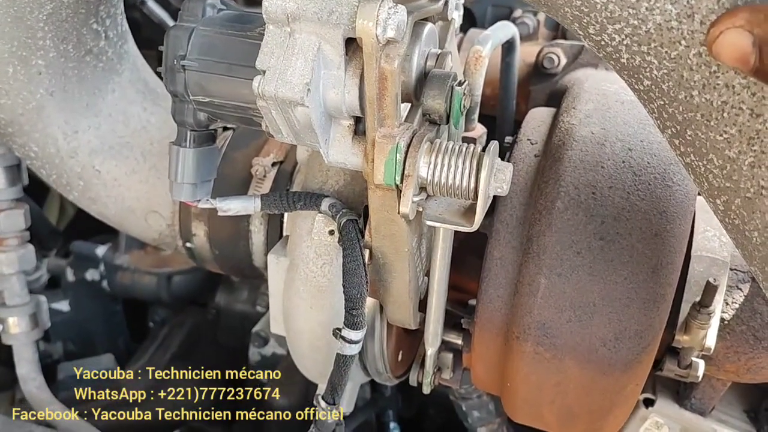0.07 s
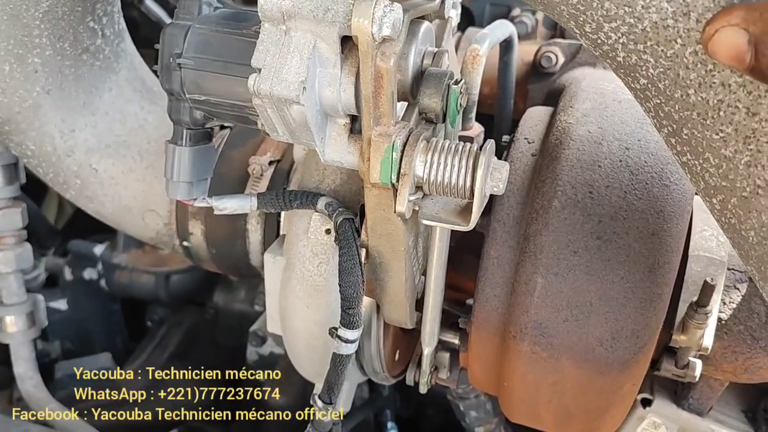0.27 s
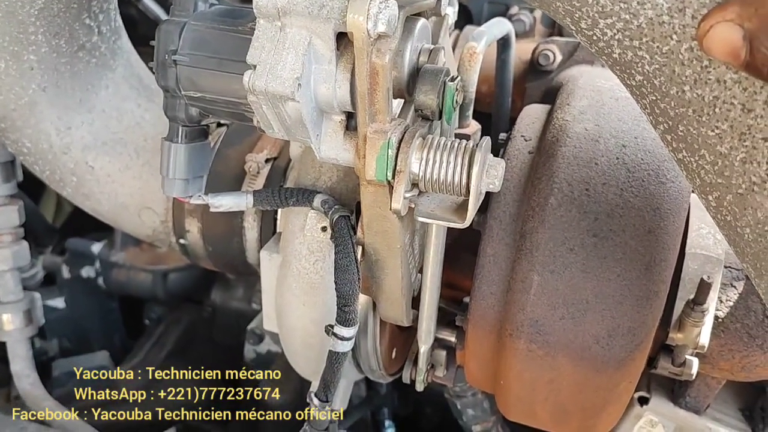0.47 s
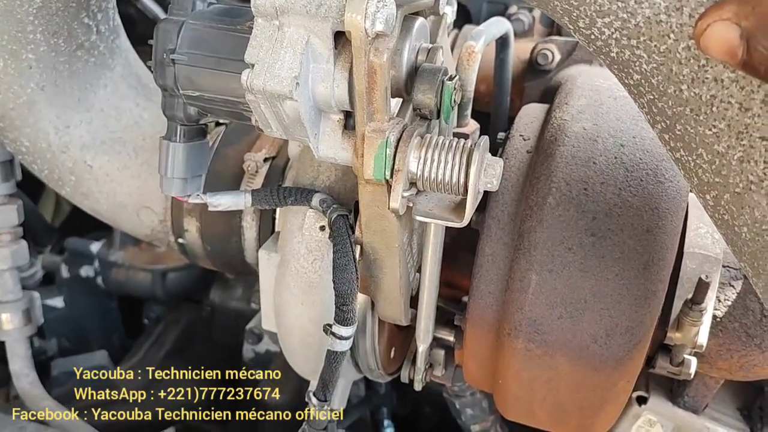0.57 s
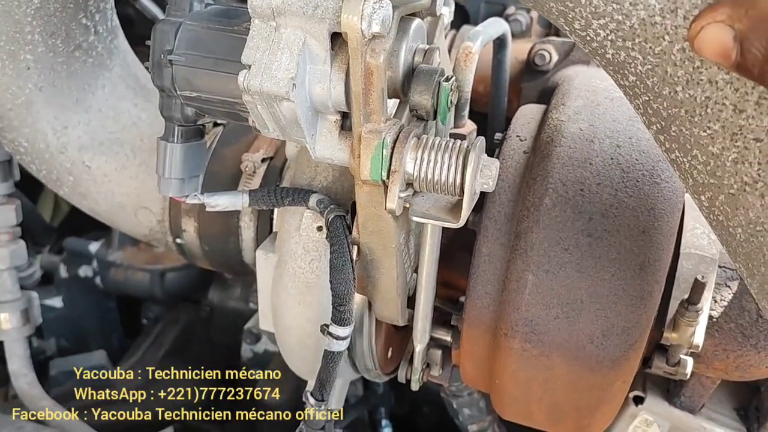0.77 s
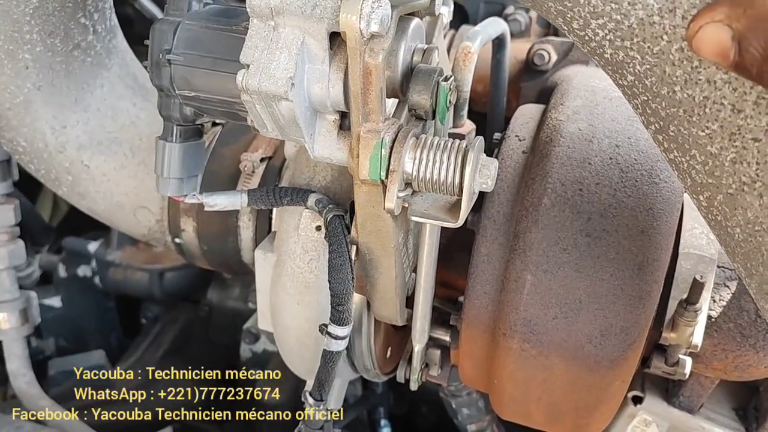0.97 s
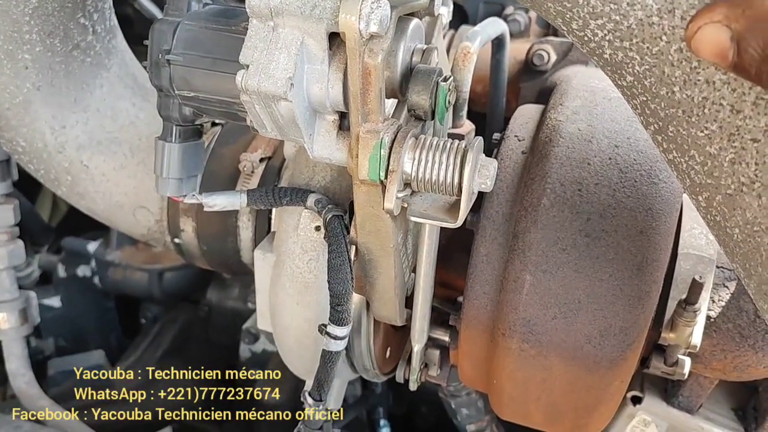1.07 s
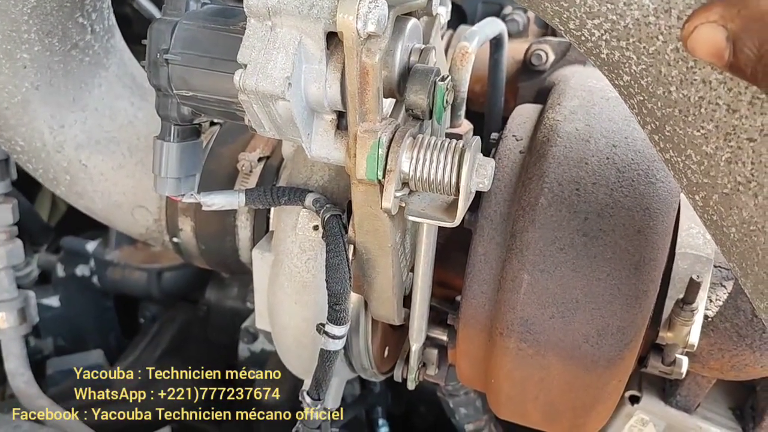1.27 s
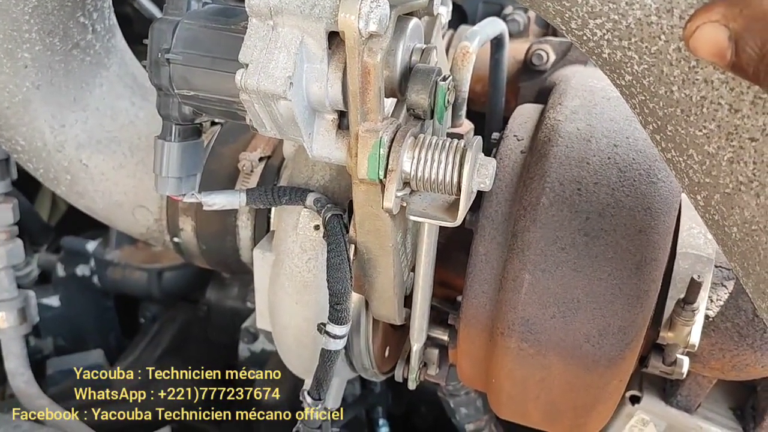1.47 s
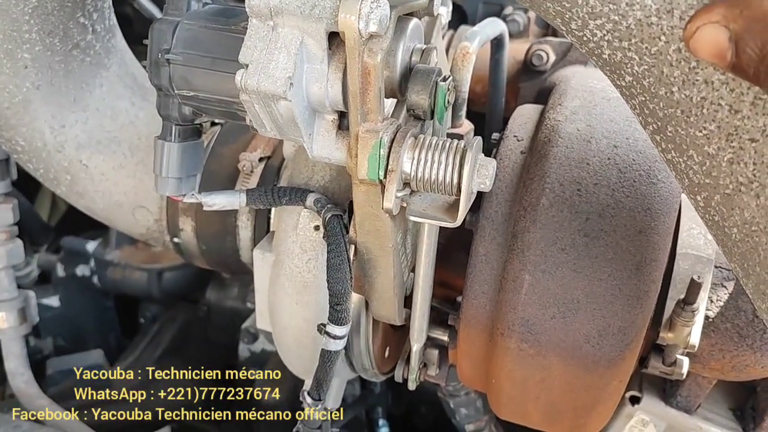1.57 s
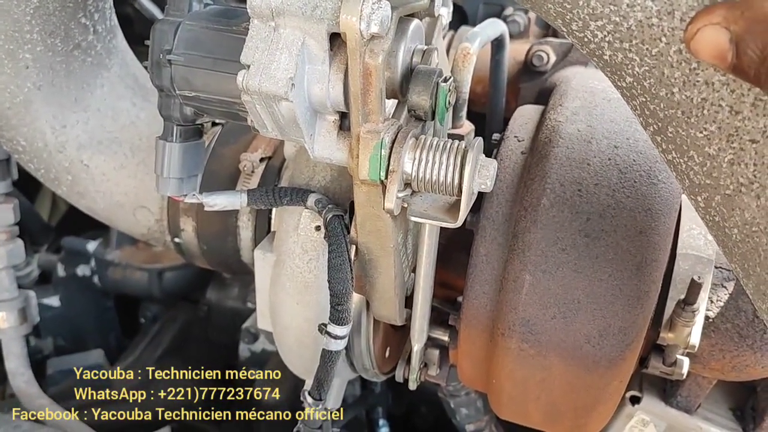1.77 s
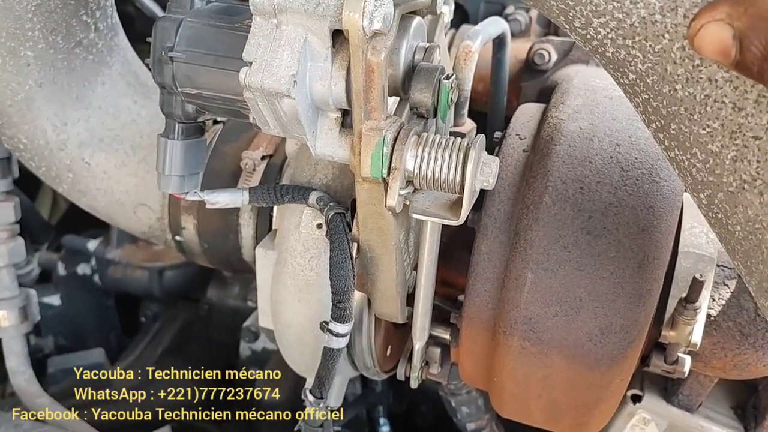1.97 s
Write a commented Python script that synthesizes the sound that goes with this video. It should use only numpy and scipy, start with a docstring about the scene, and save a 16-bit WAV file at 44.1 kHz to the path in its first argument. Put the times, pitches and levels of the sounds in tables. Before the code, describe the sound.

An electric engine actuator clacks and knocks in quick jerks, ending with a brief spring ring.

```python
"""An open workshop, the microphone close to the electric turbo actuator of a stopped truck engine.
Hum and hiss lie behind from the start, and light wind puffs on the microphone ports.
Switched on, the actuator, a little to the right, jerks its linkage to and fro: each jerk thumps the
housing, then lever, rod and stops clack. The last blow leaves the return spring ringing."""
import sys
import numpy as np
from scipy import signal
from scipy.fft import rfft, irfft, next_fast_len
from scipy.io import wavfile
from scipy.ndimage import map_coordinates

SR = 44100
rng = np.random.default_rng(int(sys.argv[2]) if len(sys.argv) > 2 else 0)


def wrap_up_sound(samples):
    """Save the sound to the file named by the first command line argument, as 16-bit audio."""
    columns = np.atleast_2d(samples).T
    # keep every value between -1 and 1, then stretch to whole-number steps
    tamed = np.clip(columns, -1, 1)
    steps = np.round(tamed * 32767).astype(np.int16)
    wavfile.write(sys.argv[1], SR, steps)


N = 88596
CONTACT_ATTACK_S = 0.0017

# how alike the two ports hear the metal: frequency_hz, likeness
METAL_LIKENESS = [(300, 1), (700, 0.49), (2000, 0.19), (10000, 0.14)]
# how alike they hear the workshop: frequency_hz, likeness
WORKSHOP_LIKENESS = [(150, 1), (500, 0.53), (1500, 0), (10000, 0)]


def amp(db):
    """Decibels to gain."""
    return 10 ** (np.asarray(db) / 20)


def unit(x):
    """Scale to rms 1."""
    return x / np.sqrt(np.mean(x ** 2) + 1e-20)


def along(points, hz):
    """Read (frequency_hz, value) points on a log axis."""
    frequencies, values = np.transpose(points)
    return np.interp(np.log(hz + 1), np.log(frequencies + 1), values)


def resonance(hz, centre_hz, width_hz):
    """A resonant peak of height 1."""
    return 1 / (1 + (2 * (hz - centre_hz) / width_hz) ** 2)


def since(start_s):
    """Seconds since a moment, zero before it."""
    return np.maximum(np.arange(N) / SR - start_s, 0)


def strike(start_s, t60_s, attack_s=CONTACT_ATTACK_S):
    """Rounded rise as the vibration spreads, exponential decay."""
    t = since(start_s)
    return (1 - np.exp(-t / attack_s)) ** 2 * np.exp(-np.log(1000) * t / t60_s)


def push(start_s, hz, swell_s, shape):
    """A few low cycles that swell and die."""
    t = since(start_s)
    return (t / swell_s * np.exp(1 - t / swell_s)) ** shape * np.sin(2 * np.pi * hz * t)


def wobble(rate_hz):
    """A smooth random curve, rate_hz knots a second."""
    return map_coordinates(rng.standard_normal(4096), [np.arange(N) * rate_hz / SR], mode="wrap")


def tone(hz, blur_rad, blur_hz):
    """An unsteady sine; the higher it is, the more its phase can differ between the ports."""
    diffuse_hz = 2720  # above this the ports hear unrelated phases
    phase = rng.random() + rng.random((2, 1)) * min(hz / diffuse_hz, 1)
    return np.sin(2 * np.pi * (hz * since(0) + phase) + blur_rad * wobble(blur_hz))


def filtered(x, response):
    """Shape x by a frequency response."""
    size = next_fast_len(N + SR // 8)
    return irfft(rfft(x, size) * response(np.fft.rfftfreq(size, 1 / SR)), size)[..., :N]


def noise(colour, likeness):
    """Stereo noise of rms 1 with a given colour and left-right likeness."""
    def mid_and_side(hz):
        angle = np.arccos(np.clip(along(likeness, hz), -1, 1)) / 2
        return colour(hz) * np.array([np.cos(angle), np.sin(angle)])
    mid, side = filtered(rng.standard_normal((2, N)), mid_and_side)
    return unit(np.array([mid + side, mid - side]))


def late_left(x, lag_ms):
    """The left port is farther from the actuator and hears it later."""
    return filtered(x, lambda hz: np.exp(-2j * np.pi * hz * np.array([[lag_ms / 1000], [0]])))


def housing_thumps():
    """Each jerk of the drive shoves the housing, which rings briefly."""
    # jerks of the drive: start_s, level_db, pitch_hz, swell_s, ring_db
    jerks = [(0.7273, -8.5, 291, 0.0025, -29.5), (0.7427, -11.5, 308, 0.0024, -26.5),
             (1.0256, -15, 214, 0.0021, -27), (1.3398, -10, 289, 0.0028, -23.5),
             (1.4401, -12, 231, 0.0028, -20), (1.6115, -10.5, 258, 0.0017, -24)]
    # low modes of the housing: pitch_hz, level_db, t60_s
    modes = [(202, 1, 0.088), (256.2, 5.5, 0.14), (333, 4, 0.11), (400.3, -10, 0.19), (514, 17.5, 0.038)]
    out = np.zeros(N)
    for start_s, db, hz, swell_s, ring_db in jerks:
        out += amp(db) * push(start_s, hz, swell_s, shape=0.98)
        for mode_hz, mode_db, t60_s in modes:
            level = amp(ring_db + mode_db + rng.normal(0, 1)) * strike(start_s, t60_s, attack_s=0.0089)
            out += level * np.sin(2 * np.pi * (mode_hz * since(start_s) + rng.random()))
    return np.array([out, out])


def linkage_clacks():
    """Contacts excite the crowded modes of the linkage, and all rattle as they die."""
    # metal contacts: start_s, base_t60_s, low_db, body_db, bite_db, treble_db, top_db
    contacts = [(0.3836, 0.12, -38, -29, -28.5, -28, -41), (0.727, 0.093, -21.5, -25, -34, -31, -38),
                (0.7428, 0.13, -48, -23, -22, -24, -32), (0.763, 0.055, -39, -13.5, -24, -24, -35),
                (0.769, 0.12, -43, -32, -32, -33, -40), (1.029, 0.16, -26.5, -20.5, -19, -18, -20),
                (1.2935, 0.082, -43, -42, -29, -22, -31), (1.34, 0.14, -32, -36.5, -35, -35, -38),
                (1.444, 0.25, -38, -24.5, -29, -30.5, -32), (1.485, 0.089, -31, -16, -20.5, -25.5, -31),
                (1.544, 0.29, -48, -40, -42, -42, -48), (1.6127, 0.45, -32, -23, -27.5, -29, -27),
                (1.634, 0.17, -39, -26, -21, -24.5, -31), (1.681, 0.066, -28.5, -32, -41, -40, -32)]
    # the five bands, low to top: centre_hz
    band_centres = [400, 1000, 2600, 6000, 12500]
    # each band's decay time over the contact's base t60: ratio
    decay_ratios = [1.85, 1.22, 1.03, 0.81, 0.85]
    # broad spectrum of the struck metal: frequency_hz, level_db
    spectrum = [(300, 0.5), (500, 13), (900, -3), (1100, -5.5), (1250, 1), (2200, -10), (3300, -11.5),
                (4600, -15.5), (6500, -17.5), (7700, -20), (9000, -21.5), (10700, -24), (12000, -33.5),
                (14000, -27.5), (16000, -35.5)]
    # resonances of the linkage: centre_hz, width_hz, lift_db
    resonances = [(405, 51, -10.5), (515, 150, -3.5), (931, 42, 8.5), (1210, 86, 4.5), (1320, 46, -8),
                  (1675, 30, 6), (2080, 450, 5.5), (2350, 130, 2.5), (2655, 50, 4.5), (3340, 720, 6),
                  (3920, 970, 3), (6360, 1400, 3.5), (8500, 310, 3.5)]
    low_cut_hz, rattle_db = 270, -0.5

    def colour(hz):
        lift_db = sum(db * resonance(hz, centre, width) for centre, width, db in resonances)
        return amp(along(spectrum, hz) + lift_db) * (hz > low_cut_hz)
    out = np.zeros((2, N))
    for k, ratio in enumerate(decay_ratios):
        band = [(hz, float(hz == band_centres[k])) for hz in band_centres]
        power = sum((amp(band_db[k]) * strike(start_s, t60_s * ratio)) ** 2
                    for start_s, t60_s, *band_db in contacts)
        out += np.sqrt(power) * noise(lambda hz: colour(hz) * along(band, hz), METAL_LIKENESS)
    return out * amp(rattle_db * wobble(rate_hz=346))


def linkage_pings():
    """Lever, rod and stops ring briefly at their own pitches; loose ones buzz."""
    # struck parts: start_s, pitch_hz, level_db, t60_s, buzz_rad
    parts = [(0.388, 393.3, -21, 0.17, 0.37), (0.388, 516, -30, 0.1, 0.33), (0.388, 997, -31.5, 0.22, .4),
             (0.385, 3350, -20, 0.049, 0.9), (0.7455, 2283, -3.5, 0.017, 1.7),
             (0.765, 912.5, -10.5, 0.09, 0.93), (0.765, 1146, -19, 0.062, .8),
             (.763, 333, -25.5, 0.26, 0.79), (1.033, 2100, -18.5, 0.1, 1.7), (1.064, 2044, -26, 0.13, 0.18),
             (1.293, 2350, -25, 0.061, 2.7), (1.348, 2094, -18.5, 0.029, 2.2),
             (1.3497, 520, -9.5, 0.031, .2), (1.357, 500, -10, 0.025, .2), (1.447, 509, -20.5, 0.092, 0.34),
             (1.448, 1790, -18, 0.065, 3.3), (1.447, 6700, -14.5, 0.045, 2.4),
             (1.488, 974, -14, 0.086, 0.5), (1.488, 1500, -16.5, 0.096, 3.43),
             (1.488, 2300, -18, 0.069, 2.5), (1.621, 877, -25, 0.26, 1.3), (1.63, 2050, -25, 0.13, 3),
             (1.656, 2035, -26, 0.3, .2), (1.683, 2015, -22, 0.18, 0.18)]
    return sum(amp(db) * strike(start_s, t60_s) * tone(hz, buzz_rad, blur_hz=190)
               for start_s, hz, db, t60_s, buzz_rad in parts)


def spring_ring():
    """The return spring rings on after the blows that reach it, then settles."""
    # modes of the spring: pitch_hz, level_db, t60_s
    modes = [(2022, 2, 0.2), (2120, -0.5, 0.13), (2600, -9, 0.65), (2907, -14, 0.83), (3100, -30, 0.4),
             (3480, -11, 0.29), (5430, -18.5, 0.91)]
    # blows that reach it: start_s, level_db
    blows = [(1.033, -45), (1.617, -22.5), (1.683, -28)]
    # faint last rings as it settles: start_s, pitch_hz, level_db, t60_s
    last_rings = [(1.8, 1520, -37.5, 0.37), (1.8, 1639, -40.5, 1)]

    def ring(hz, flutter_db=3):
        flutter = unit(amp(flutter_db * wobble(rate_hz=70)))
        return flutter * tone(hz, blur_rad=1.1, blur_hz=85)
    out = np.zeros((2, N))
    for hz, db, t60_s in modes:
        power = sum((amp(blow_db) * strike(start_s, t60_s)) ** 2 for start_s, blow_db in blows)
        out += amp(db) * np.sqrt(power) * ring(hz)
    for start_s, hz, db, t60_s in last_rings:
        out += amp(db) * strike(start_s, t60_s, attack_s=0.0085) * ring(hz)
    return out


def coil_chatter():
    """The spring's coils chatter after the last jerk; crowded high modes make the spectrum ragged."""
    # spectrum of the coils: frequency_hz, level_db
    spectrum = [(1500, -5), (3000, 3.5), (4700, 1), (6000, 3.5), (7700, -2), (9000, 4), (10700, 3),
                (12000, -12), (14000, -6), (16000, -19)]
    mode_spacing_hz, ripple_db, low_cut_hz, hold_s = 46.1, 5, 1500, 0.16
    mode_strengths = np.clip(rng.standard_normal(2048), -2, 2)

    def colour(hz):
        ripple = map_coordinates(mode_strengths, [hz / mode_spacing_hz], mode="wrap")
        return amp(along(spectrum, hz) + ripple_db * ripple) * (hz > low_cut_hz)
    t = since(start_s=1.62)
    envelope = (1 - np.exp(-t / CONTACT_ATTACK_S)) * np.exp(-(t / hold_s) ** 1.43)
    return amp(-31) * envelope * noise(colour, METAL_LIKENESS)


def squeak(peak_s=0.605, width_s=0.013, pitch_hz=3480):
    """One faint, short chirp."""
    t = since(0)
    envelope = np.exp(-((t - peak_s) / width_s) ** 2)
    return amp(-47) * envelope * np.sin(2 * np.pi * pitch_hz * t + wobble(rate_hz=210))


def scrape(peak_s=0.527, width_s=0.058):
    """A faint, brief scraping hiss."""
    hiss = noise(lambda hz: resonance(hz, centre_hz=5000, width_hz=6600), WORKSHOP_LIKENESS)
    return amp(-46) * np.exp(-((since(0) - peak_s) / width_s) ** 2) * hiss


def wind():
    """Wind on the microphone: low rumble and single puffs, mostly on the left port."""
    # rise and fall of the rumble: time_s, level_db
    gusts = [(0.0, -52.5), (0.31, -46.5), (0.34, -35.5), (0.85, -50), (1.05, -32.5), (1.08, -44),
             (1.46, -43), (1.58, -57), (1.61, -37), (1.68, -39), (1.95, -28.5), (2.0, -34.5)]
    # spectrum of the rumble: frequency_hz, level_db
    spectrum = [(12, -28), (20, -16), (97, 4), (124, -8), (157, -2), (178, -9.5), (250, -11.5),
                (320, -14.5), (550, -120)]
    # puffs on the ports: start_s, left_db, pitch_hz, swell_s, right_offset_db
    puffs = [(0.331, -18, 98, 0.0033, -23), (0.3764, -15.5, 97, 0.0057, -40), (0.41, -20, 77, 0.007, -29),
             (0.954, -15, 112, 0.0064, -25), (0.986, -23.5, 86, 0.012, -24), (1.045, -27, 70, 0.0066, 4),
             (1.148, -23, 100, 0.0072, -30), (1.798, -12, 186, 0.0028, -22), (1.838, -17, 100, 0.011, -34),
             (1.845, -17, 222.8, 0.0031, -25), (1.906, -15, 108, 0.011, -44),
             (1.933, -23, 56.7, 0.0033, 10.5), (1.956, -13.5, 174, 0.0026, -5)]
    level = amp(np.interp(since(0), *np.transpose(gusts)) - 1)
    rumble = noise(lambda hz: amp(along(spectrum, hz)), likeness=[(25, 0), (100, 0.68)])
    out = level * rumble * amp([[5], [-5]])
    for start_s, left_db, hz, swell_s, right_offset_db in puffs:
        out += amp([[left_db], [left_db + right_offset_db]]) * push(start_s, hz, swell_s, shape=3.9)
    return out


def workshop():
    """Even hiss and the hum of a distant machine: a steady line in a fuzzy band."""
    # spectrum of the hiss: frequency_hz, level_db
    spectrum = [(88, 2), (150, -2.5), (286, -7), (328, -6.5), (439, -5.5), (484, -11), (805, -9.5),
                (1360, -15), (1980, -13.5), (2600, -17), (3420, -18.5), (4160, -20.5), (5680, -16.5),
                (7620, -21), (9440, -21), (14800, -31), (16000, -30)]
    hum_hz, sway_db = 433.3, 0.5
    fuzz = noise(lambda hz: resonance(hz, hum_hz, width_hz=86), WORKSHOP_LIKENESS)
    line = unit(tone(hum_hz, blur_rad=0.7, blur_hz=14))
    hiss_level = amp(-40 + sway_db * wobble(rate_hz=11.5))
    hiss = noise(lambda hz: amp(along(spectrum, hz)), WORKSHOP_LIKENESS)
    return hiss_level * hiss + amp(-51) * (fuzz + line)


def room(x):
    """A diffuse answer from the surroundings."""
    tail = rng.standard_normal((2, N)) * strike(0, t60_s=1, attack_s=0.004)
    return signal.fftconvolve(x, tail / np.linalg.norm(tail[0]), axes=1)[:, :N]


def scene():
    """The actuator close up and a little to the right, the workshop behind it."""
    clacks = linkage_clacks()
    ringing = linkage_pings() + spring_ring() + coil_chatter()
    metal = clacks + ringing * amp([[2.14], [-2.14]])  # the ringing parts favour the left port
    actuator = late_left(housing_thumps(), lag_ms=0.31) + late_left(metal, lag_ms=0.451)
    return actuator + amp(-28.5) * room(actuator) + squeak() + scrape() + wind() + workshop()


def record(dry):
    """The recorder keeps nothing above 16.1 kHz."""
    return filtered(dry, lambda hz: hz < 16100)


dry = scene()
out = record(dry)
wrap_up_sound(out)
```